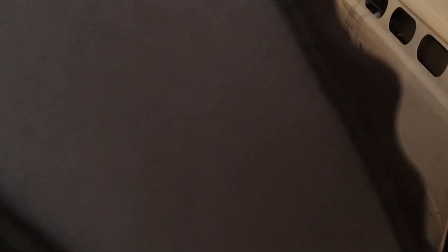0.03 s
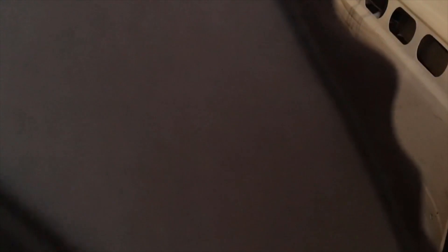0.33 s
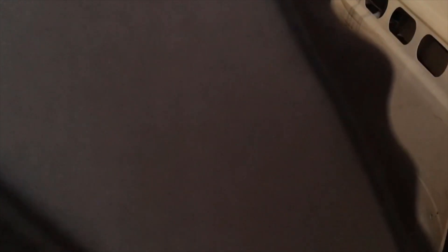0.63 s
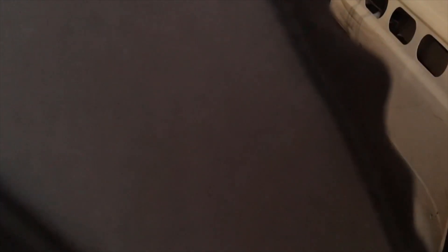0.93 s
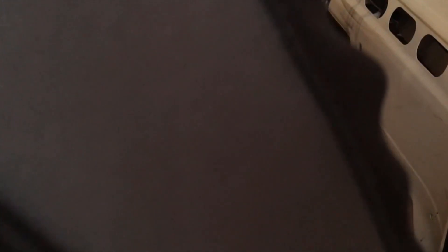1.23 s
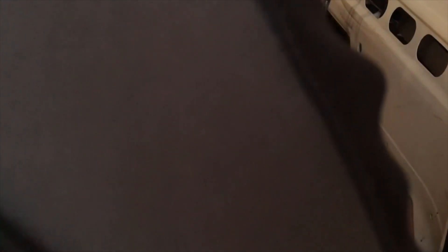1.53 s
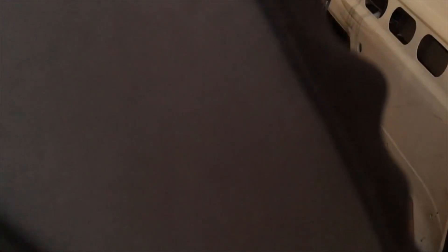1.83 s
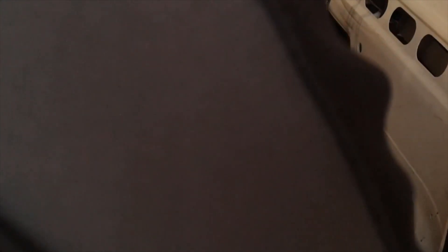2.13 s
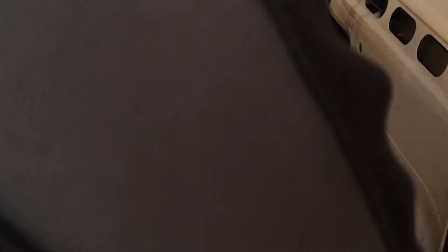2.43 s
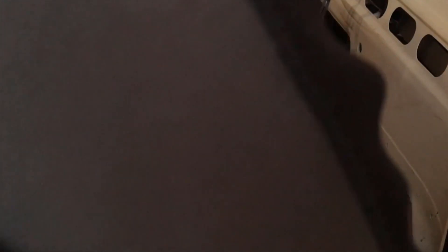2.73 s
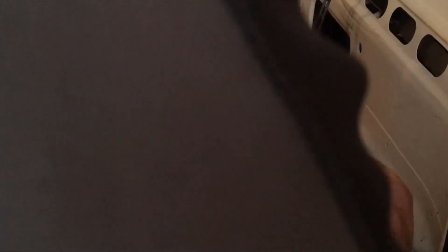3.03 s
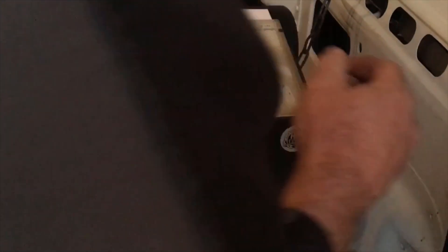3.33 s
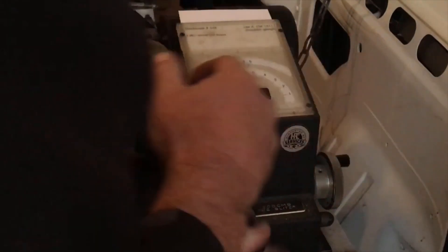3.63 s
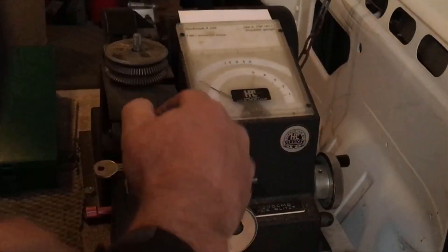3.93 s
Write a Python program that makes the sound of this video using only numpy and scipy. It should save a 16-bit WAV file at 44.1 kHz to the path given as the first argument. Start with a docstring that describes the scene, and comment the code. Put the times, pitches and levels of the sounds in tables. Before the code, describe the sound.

Close up in a van, a key cutting machine grinds a key with a fast pulsing, ringing rasp over a low motor hum. The cutting eases off and ends, leaving hum and fan hiss, soft handling taps and one metal knock.

```python
"""Inside a van, a key cutting machine runs: its motor hums over a low drone and the rush of belt and fan.
A key is held to the spinning toothed cutter, which bites once a turn: the teeth sing, the key chatters,
chips rasp and the bench shudders. The contact gets lighter until the key is clear.
A hand then taps the carriage lightly and knocks it back against its stop."""
import sys
import numpy as np
from scipy import signal
from scipy.fft import rfft, irfft, next_fast_len
from scipy.io import wavfile
from scipy.ndimage import uniform_filter1d, map_coordinates

SR = 44100
rng = np.random.default_rng(int(sys.argv[2]) if len(sys.argv) > 2 else 0)


def put_to_file(sound):
    """Save the sound as 16-bit audio at rate SR, in the file named by the first command-line argument."""
    columns = np.atleast_2d(sound).T  # one column per channel
    safe = np.clip(columns, -1, 1)
    whole_steps = np.round(safe * 32767)
    wavfile.write(sys.argv[1], SR, whole_steps.astype(np.int16))


N = 176400
TIME_S = np.arange(N) / SR


def amp(db):
    return 10 ** (np.asarray(db) / 20)


def unit(x):
    return x / np.sqrt(np.mean(x ** 2) + 1e-20)


def curves(rows):
    """One value per sample for each column after the time."""
    times_s, *columns = np.transpose(rows)
    return [np.interp(TIME_S, times_s, column) for column in columns]


def wobble(rate_hz):
    """Smooth random curve, rate_hz knots a second."""
    knots = rng.standard_normal(int(N * rate_hz / SR) + 4)
    return map_coordinates(knots, [TIME_S * rate_hz])


def filtered(x, response):
    """x through a complex frequency response."""
    size = next_fast_len(N + SR // 2)
    return irfft(rfft(x, size) * response(np.fft.rfftfreq(size, 1 / SR)), size)[:N]


def coloured(x, spectrum):
    """x shaped by (frequency [Hz], gain [dB]) points; rms 1."""
    points_hz, db = np.transpose(spectrum)
    return unit(filtered(x, lambda hz: amp(np.interp(np.log(hz + 1), np.log(points_hz + 1), db))))


def noise(spectrum):
    """Coloured noise; rms 1."""
    return coloured(rng.standard_normal(N), spectrum)


def tone(cycles):
    """Sine; rms 1."""
    return np.sqrt(2) * np.sin(2 * np.pi * cycles)


def harmonics(cycles, table, waver_db, drift_cycles, rate_hz):
    """Multiples of a rotation, each wavering in level and phase."""
    return sum(amp(db + waver_db * wobble(rate_hz))
               * tone(k * cycles + rng.random() + drift_cycles * wobble(rate_hz)) for k, db in table)


def resonate(x, modes):
    """x through resonances of alternating sign; rms 1."""
    def response(hz):
        return sum((-1) ** k * amp(db) * 1j * hz * width / (centre ** 2 - hz ** 2 + 1j * hz * width)
                   for k, (centre, width, db) in enumerate(modes))
    return unit(filtered(x, response))


def ring(modes, age_s):
    """Modes fading after a blow."""
    return sum(amp(db - 60 * age_s / t60_s) * np.sin(2 * np.pi * hz * age_s + 0.3 * wobble(150))
               for hz, db, t60_s in modes)


def cab(x, t60_s=0.08, echo_db=-13):
    """Adds the short echo of the van's walls."""
    t = np.arange(SR // 4) / SR
    tail = rng.standard_normal(len(t)) * amp(-60 * t / t60_s) * (t > 0.003)
    return x + amp(echo_db) * signal.fftconvolve(x, tail / np.linalg.norm(tail))[:N]


# drone partials (multiple of the turning rate, level [dB])
DRONE_PARTIALS = [(1, -68), (2, -54.5), (3, -52), (4, -56.5), (5, -60), (6, -57), (7, -57.5)]


def drone(turning_hz=23.78):
    """Low drone, as of an idling engine."""
    return harmonics(turning_hz * TIME_S, DRONE_PARTIALS, waver_db=2.5, drift_cycles=0.11, rate_hz=4.025)


# fan hiss and air rush (frequency [Hz], relative density [dB])
FAN_SPECTRUM = [(900, -6), (1900, -9), (2250, -0.5), (2480, -1.5), (2680, -12), (2850, 0), (3200, -9),
                (4200, -8.5), (5200, -17), (6200, -19), (8000, -24), (12000, -26), (15800, -28)]
AIR_SPECTRUM = [(25, -22), (41, 4), (65, -1), (180, -0.5), (320, -3.5), (420, -12), (600, -10.5),
                (710, -5.5), (830, -13.5), (1050, -10), (1400, -14), (1650, -11), (1900, -14),
                (2600, -16.5), (3200, -21.5), (3800, -26.5), (4100, -17.5), (4350, -25), (5000, -34),
                (6200, -27), (7200, -39), (9000, -38.5), (10500, -45.5), (12200, -40.5), (15000, -46),
                (15800, -55)]


def belt_and_fan(fan_db, air_db=-46.5):
    """The fan hisses over a steady rush of air."""
    return amp(fan_db) * noise(FAN_SPECTRUM) + amp(air_db + 0.36 * wobble(10)) * noise(AIR_SPECTRUM)


# motor hum (multiple of the mains, level [dB])
HUM_PARTIALS = [(1, -50), (2, -56.5), (4, -53.5), (5, -62.5), (6, -44.5), (8, -64), (10, -67), (12, -50),
                (16, -65), (18, -66), (22, -64.5), (26, -68), (40, -65)]


def motor(hum_gain_db, fan_db, mains_hz=59.83, whine_hz=2729):
    """Electric motor: mains hum, a whine and a thin high buzz that follows the fan's level."""
    hum = harmonics(mains_hz * TIME_S, HUM_PARTIALS, waver_db=0.5, drift_cycles=0.015, rate_hz=5)
    whine = harmonics(whine_hz * TIME_S, [(1, -66.5)], waver_db=1, drift_cycles=0.068, rate_hz=8)
    buzz = amp(-57 + 0.59 * (fan_db - fan_db.max())) * tone(42 * mains_hz * TIME_S)
    return amp(hum_gain_db) * hum + whine + buzz


# shaft vibration (multiple of the cutter speed, level [dB])
SHAFT_PARTIALS = [(6, -62), (8, -54), (9, -63), (10, -53)]


def shaft(turns):
    """The cutter's shaft shakes as it turns."""
    return harmonics(turns, SHAFT_PARTIALS, waver_db=2, drift_cycles=0.084, rate_hz=4.97)


# shielding by the operator (time [s], hum and drone gain [dB], fan level [dB])
SHIELDING = [(0, 0.5, -70), (1.2, -1, -65), (2.7, -1, -73), (3.05, -2, -61.5), (3.4, -2, -56.5),
             (4, -0.5, -55.5)]


def background(turns):
    """Running machine and drone; the hiss rises as the operator steps aside."""
    gain_db, fan_db = curves(SHIELDING)
    return motor(gain_db, fan_db) + amp(gain_db) * drone() + shaft(turns) + belt_and_fan(fan_db)


# bench shudder (time [s], level [dB])
SHUDDER_LEVEL = [(1.2, -72), (1.3, -56), (1.6, -50.5), (2.1, -48.5), (2.5, -50), (2.9, -50.5), (3, -75)]
# bench response (frequency [Hz], relative density [dB])
BENCH_SPECTRUM = [(70, -40), (120, 8.5), (180, -13), (290, 5), (340, -3.5), (450, -24), (1000, -64)]


def shudder():
    """The bench shakes while the cutter is loaded."""
    level_db, = curves(SHUDDER_LEVEL)
    return amp(level_db) * noise(BENCH_SPECTRUM)


# impact crack (frequency [Hz], relative density [dB])
CRACK_SPECTRUM = [(100, -16), (400, 1), (900, -4.5), (1650, 4.5), (2700, -1.5), (4500, -10.5), (8000, -19),
                  (15800, -26)]
# carriage, bench and small metal parts (frequency [Hz], gain [dB], t60 [s])
CARRIAGE_MODES = [(634, -6.5, 0.12), (1390, -15, 0.059), (1574, -5, 0.059), (2165, -0.5, 0.033),
                  (2700, -6, 0.038), (4150, -2.5, 0.028)]
THUD_MODES = [(121, -11.5, 0.15), (234, 0.5, 0.093), (301, 0.5, 0.11)]
PING_MODES = [(6030, -1, 0.024), (6400, -5, 0.03), (7000, -12, .03)]
CLINK_MODES = [(2490, 0.5, .09)]


def carriage_blows(blows, crack_t60_s, ring_db, attack_s, cutoff_hz):
    """Each blow cracks, rings the carriage and thuds into the bench; a soft touch dulls the crack."""
    out = np.zeros(N)
    for start_s, metal_db, thud_db, ping_db, clink_db in blows:
        age_s = np.maximum(TIME_S - start_s, 0)
        crack = filtered(noise(CRACK_SPECTRUM), lambda hz: 1 / np.sqrt(1 + (hz / cutoff_hz) ** 4))
        metal = amp(-60 * age_s / crack_t60_s) * crack + amp(ring_db) * ring(CARRIAGE_MODES, age_s)
        parts = amp(ping_db) * ring(PING_MODES, age_s) + amp(clink_db) * ring(CLINK_MODES, age_s)
        thud = amp(thud_db) * ring(THUD_MODES, age_s)
        out += (1 - np.exp(-age_s / attack_s)) * (amp(metal_db) * metal + thud + parts)
    return out


# blows on the carriage (time [s], metal gain [dB], thud gain [dB], ping gain [dB], clink gain [dB])
HAND_TAPS = [(3.285, -36.5, -31, -44, -50), (3.331, -47, -47, -51, -40), (3.727, -40, -37, -38.5, -50),
             (3.776, -36, -32, -45, -50)]
STOP_KNOCKS = [(3.9622, -21, -35.5, -43, -45), (3.9678, -21.5, -20.5, -33.5, -36)]


def handling():
    """A hand taps the carriage, then knocks it against its stop."""
    taps = carriage_blows(HAND_TAPS, crack_t60_s=0.076, ring_db=-1, attack_s=0.0027, cutoff_hz=5500)
    knocks = carriage_blows(STOP_KNOCKS, crack_t60_s=0.048, ring_db=-1.5, attack_s=0.0011, cutoff_hz=16000)
    return taps + knocks


def swell(turns, crest_turns, width_turns, depth_db):
    """Envelope of a ring that builds and fades once a turn, never quite stopping; rms 1."""
    offset = (turns - crest_turns + 0.5) % 1 - 0.5
    return unit(np.exp(-0.5 * (offset / width_turns) ** 2) + amp(-depth_db))


# lighter contact bites more abruptly and briefly, lets go further, trembles more
# (time [s], rise [dB/turn], hold [turns], extra depth [dB], tremble [cycles])
BITE_SHAPE = [(1.3, 42, 0.22, -8, .02), (1.6, 60, 0.24, -5, .03), (2.1, 120, 0.19, 4, .09),
              (2.6, 190, 0.12, 10, .24)]


def bite(turns, lag_turns, fall_db_per_turn, depth_db):
    """Envelope: once a turn the cutter digs in, holds and eases off; rms near 1."""
    rise_db_per_turn, hold_turns, extra_depth_db, _ = curves(BITE_SHAPE)
    phase = (turns - lag_turns) % 1
    easing = amp(-fall_db_per_turn * np.maximum(phase - hold_turns, 0))
    digging = amp(-rise_db_per_turn * (1 - phase))
    ripple = amp(-0.2 * np.cos(2 * np.pi * 4 * (phase - 0.04)))  # four pressure swells a turn
    pressure = (np.maximum(easing, digging) + amp(-depth_db - extra_depth_db)) * ripple
    return pressure / np.sqrt(uniform_filter1d(pressure ** 2, size=3020))  # over about two turns


TEETH = 72


def strikes(turns, scatter):
    """One impulse per tooth: its own unevenness plus random scatter on each pass."""
    tooth = np.floor(turns * TEETH).astype(int)
    hits = np.flatnonzero(np.diff(tooth))
    unevenness = unit(irfft(np.exp(2j * np.pi * rng.random(TEETH // 2 + 1))))
    impulses = np.zeros(N)
    impulses[hits] = unevenness[tooth[hits] % TEETH] + scatter * rng.standard_normal(len(hits))
    return impulses


def scraping(turns):
    """Tooth strikes and noise, pulsed by the bite."""
    grit = unit(unit(strikes(turns, scatter=0.43)) + 1.07 * rng.standard_normal(N))
    return bite(turns, lag_turns=0.1, fall_db_per_turn=19.5, depth_db=14) * grit


# chip hiss (frequency [Hz], relative density [dB])
CHIP_SPECTRUM = [(1500, -7), (4500, -9), (5500, 3.5), (7500, -7.5), (9000, 1.5), (12000, -2), (13700, -3),
                 (15800, 1)]


def chips(turns):
    """Chips hiss at each bite."""
    return amp(-9.7) * bite(turns, lag_turns=0.01, fall_db_per_turn=30, depth_db=20) * noise(CHIP_SPECTRUM)


# rasp colour (frequency [Hz], relative gain [dB])
RASP_SPECTRUM = [(200, -6), (600, -7.5), (900, -3), (1400, -4.5), (1600, 2.5), (1900, 1), (2500, -3),
                 (2700, 3), (3400, -13), (3900, -4), (4500, -10.5), (5200, -11.5), (7000, -18.5),
                 (15800, -24)]
# clamp resonances (frequency [Hz], width [Hz], relative gain [dB])
CLAMP_RESONANCES = [(2083, 126, -2.5), (2474, 110, 4), (3806, 195, -6), (4220, 140, 0.5)]


def rasp(scrape):
    """The scrape sounds as a broad rasp and rings the clamp."""
    return amp(-2) * coloured(scrape, RASP_SPECTRUM) + resonate(scrape, CLAMP_RESONANCES)


# key and jaw resonances (frequency [Hz], width [Hz], relative gain [dB])
KEY_RESONANCES = [(706, 34, -9), (962, 80, -10.5), (1182, 67, -6.5), (1586, 37, -13)]
JAW_RESONANCES = [(2860, 39, -12.5), (3190, 74, 8.5), (3530, 28, -9)]


def key_chatter(turns, scrape):
    """The key springs back after each bite and shivers as the next starts; the jaws ring along."""
    spring = swell(turns, crest_turns=0.5, width_turns=0.08, depth_db=17)
    shiver = swell(turns, crest_turns=0.05, width_turns=0.15, depth_db=20)
    kicks = unit(spring + amp(-2) * shiver)
    rattle = resonate(strikes(turns, scatter=0.44) * kicks, KEY_RESONANCES)
    clean_ring = kicks * tone(39 * turns + 0.07 * wobble(120))  # locked to the turning
    return amp(-5) * clean_ring + amp(-5.5) * rattle + amp(-12) * resonate(scrape, JAW_RESONANCES)


def tooth_tone(turns, k, smear_cycles, rate_hz, rough_db):
    """Multiple k of the tooth rate, smeared as the key trembles."""
    return amp(rough_db * wobble(260)) * tone(k * TEETH * turns + smear_cycles * wobble(rate_hz))


# treble overtones (multiple of the tooth rate, gain [dB])
SQUEAL_PARTIALS = [(3, -2.5), (4, -6), (5, -5), (6, -3), (7, -6)]


def squeal(turns, tremble_cycles, sag_turns=0.00073):
    """Overtones of the tooth note, bent as each bite holds the teeth back."""
    flexed = turns + sag_turns * np.cos(2 * np.pi * (turns - 0.1)) + 0.0005 * wobble(130)
    overtones = sum(amp(db) * tooth_tone(flexed, k, 0.11 + tremble_cycles / 3, rate_hz=330, rough_db=2.5)
                    for k, db in SQUEAL_PARTIALS)
    return amp(-1.8) * bite(turns, lag_turns=0.02, fall_db_per_turn=43, depth_db=21) * overtones


def singing_teeth(turns, tremble_cycles, note_db, octave_db):
    """The tooth note swells once a turn; its octave follows the bite, then swells again."""
    note = tooth_tone(turns, 1, tremble_cycles, rate_hz=170, rough_db=1)
    note *= swell(turns, crest_turns=0.32, width_turns=0.16, depth_db=9)
    octave = tooth_tone(turns, 2, tremble_cycles + 0.07, rate_hz=240, rough_db=1.8)
    grip = bite(turns, lag_turns=0.022, fall_db_per_turn=47, depth_db=25)
    after_ring = amp(3) * swell(turns, crest_turns=0.36, width_turns=0.074, depth_db=14.5)
    return amp(note_db - 1) * note + amp(octave_db - 3) * unit(grip + after_ring) * octave


# gains in the cut (time [s], chatter [dB], tooth note [dB], octave [dB], rasp and chips [dB], squeal [dB])
CUT_GAINS = [(1.28, -37, -38, -43, -42, -51.5), (1.5, -40.5, -39.5, -40.5, -43.5, -51.5),
             (1.68, -41, -41.5, -42.5, -43, -52), (1.82, -45, -44.5, -43.5, -45, -51.5),
             (1.94, -44.5, -45, -41.5, -43, -51), (2.12, -53, -47.5, -45, -48.5, -52),
             (2.38, -60, -48.5, -45.5, -50, -55), (2.55, -66, -52, -53.5, -51, -58),
             (2.7, -56, -53.5, -53, -57.5, -60.5), (2.9, -59.5, -54, -58, -58, -61)]
# key meets and leaves the cutter (time [s], gain [dB])
CONTACT_GAIN = [(1.2, -64), (1.213, -10), (1.235, -18), (1.241, 1.5), (2.935, 1), (2.965, -45), (3.05, -90)]
# every second bite is stronger as the key comes clear (time [s], swing [dB])
SKIP_SWING = [(2.5, 0), (2.78, 2.3)]


def cutting(turns):
    """The key on the cutter: all its sounds follow the contact, and the treble flickers."""
    chatter_db, note_db, octave_db, rasp_db, squeal_db = curves(CUT_GAINS)
    tremble_cycles = curves(BITE_SHAPE)[-1]
    contact_db = curves(CONTACT_GAIN)[0] + curves(SKIP_SWING)[0] * np.cos(np.pi * (turns - 0.2))
    teeth = singing_teeth(turns, tremble_cycles, note_db, octave_db)
    scrape = scraping(turns)
    body = teeth + amp(rasp_db) * rasp(scrape) + amp(chatter_db) * key_chatter(turns, scrape)
    treble = amp(squeal_db) * squeal(turns, tremble_cycles) + amp(rasp_db) * chips(turns)
    return amp(contact_db + 0.39 * wobble(28.86)) * (body + amp(1.03 * wobble(28.89)) * treble)


# cutter rotation (time [s], speed [turns/s])
CUTTER_SPEED = [(0, 29.6), (1.2, 29.6), (1.27, 29.15), (1.7, 29.14), (2.1, 29.24), (2.9, 29.33),
                (3.05, 29.6), (4, 29.6)]
BITE_S = 2.0325  # one bite reaches full depth


def scene():
    """Mono mix; the cutter's rotation times the shaft and the cut."""
    speed_hz, = curves(CUTTER_SPEED)
    turns = np.cumsum(speed_hz) / SR
    turns -= np.interp(BITE_S, TIME_S, turns)
    hand = handling()
    return (background(turns) + shudder() + cab(cutting(turns) + hand))[None]


def record(dry, top_hz=15850):
    """Brick-wall low-pass."""
    return filtered(dry[0], lambda hz: hz < top_hz)[None]


dry = scene()
out = record(dry)
put_to_file(out)
```